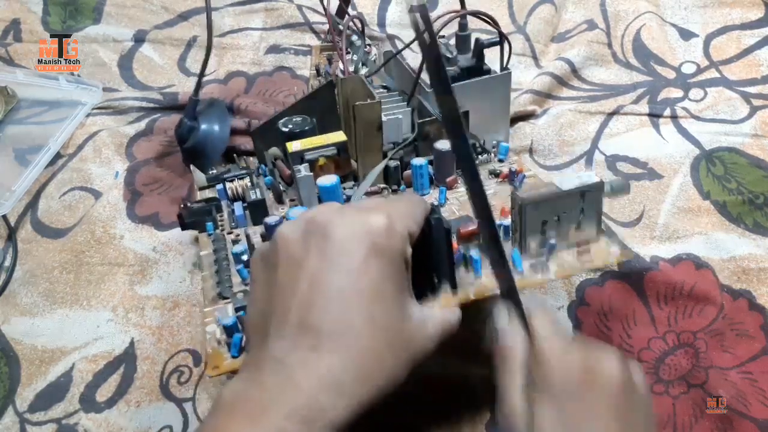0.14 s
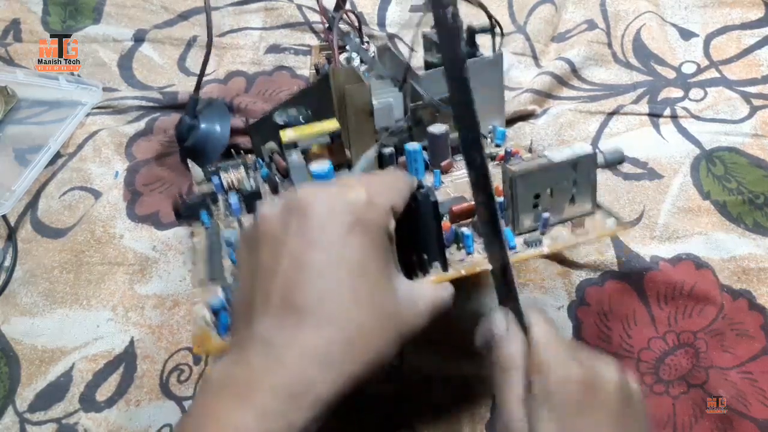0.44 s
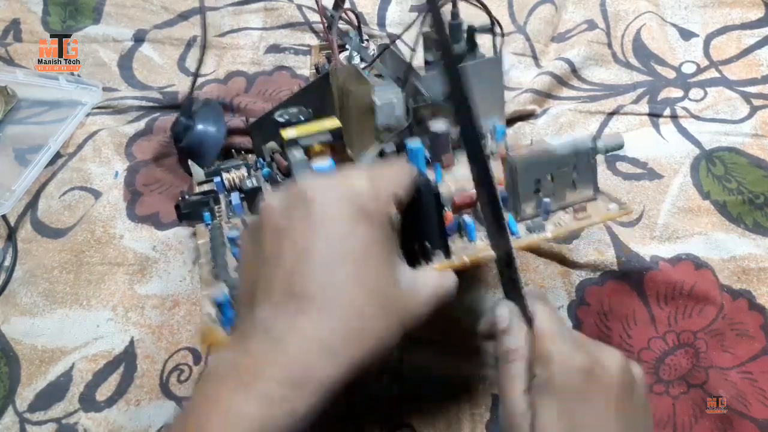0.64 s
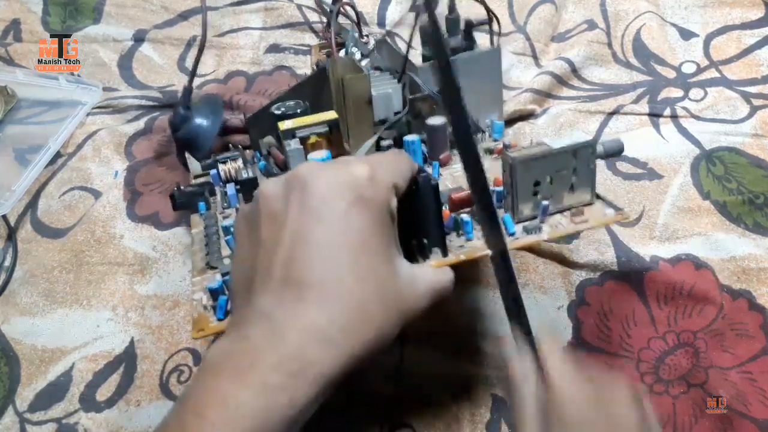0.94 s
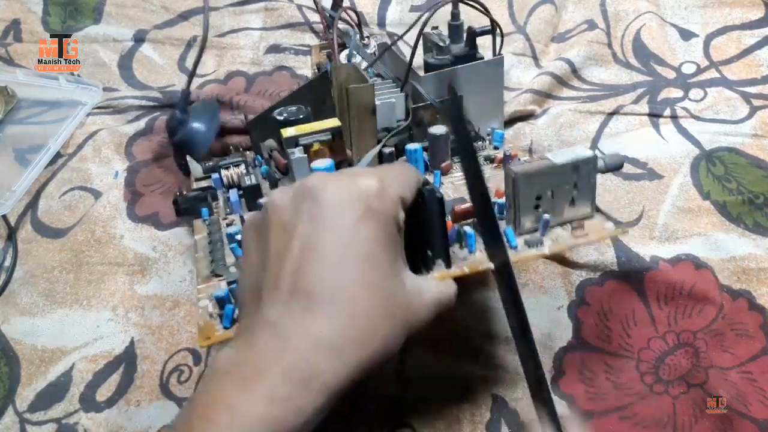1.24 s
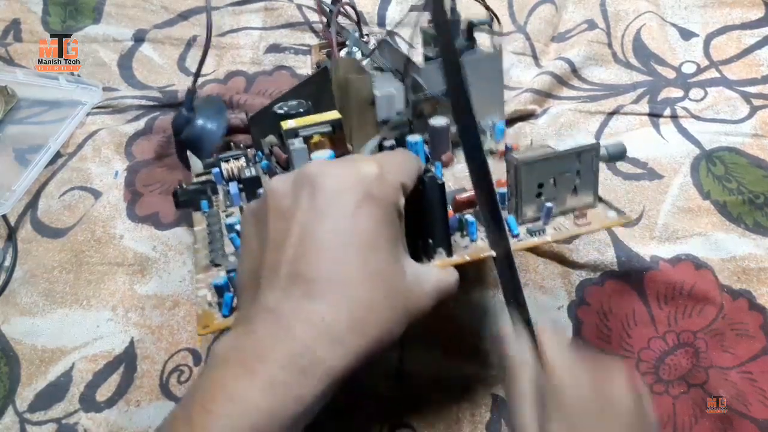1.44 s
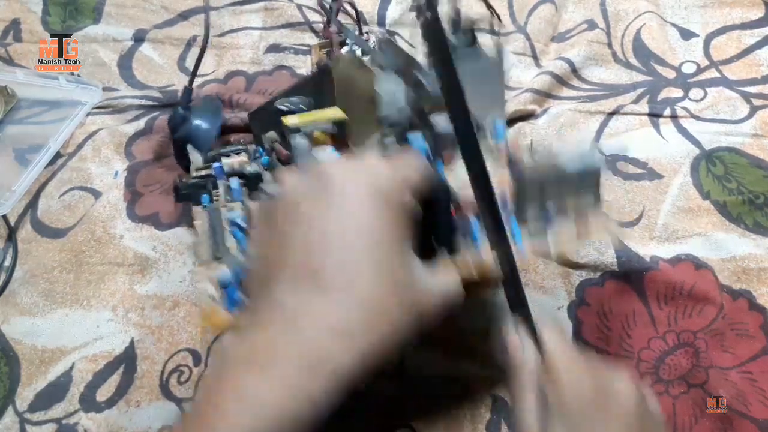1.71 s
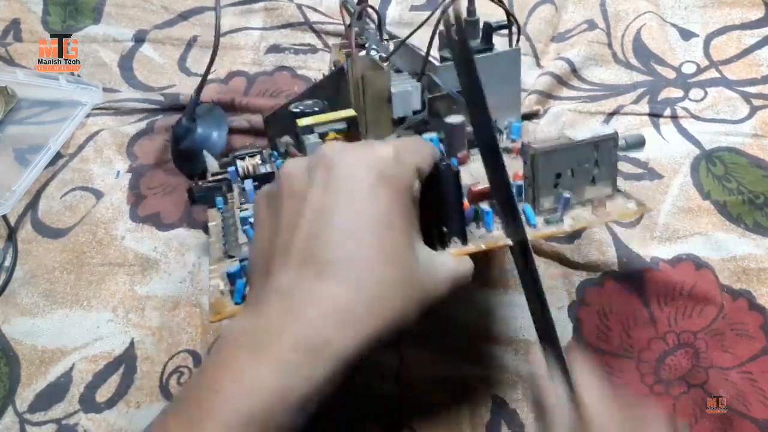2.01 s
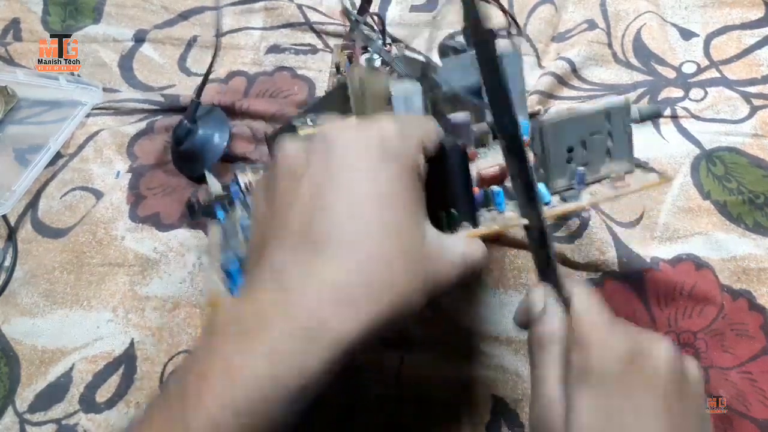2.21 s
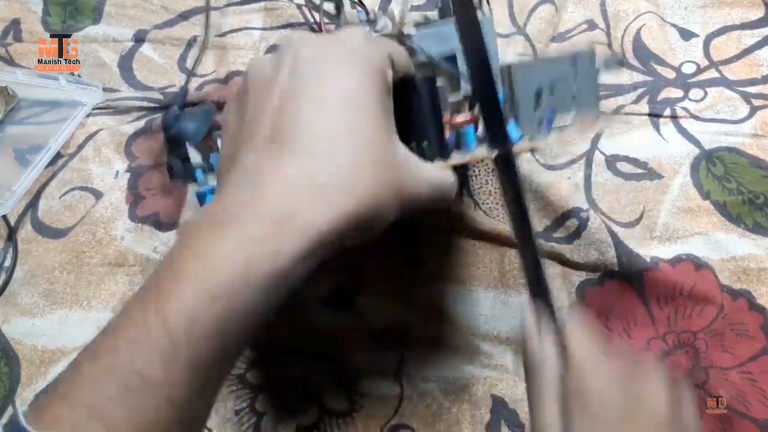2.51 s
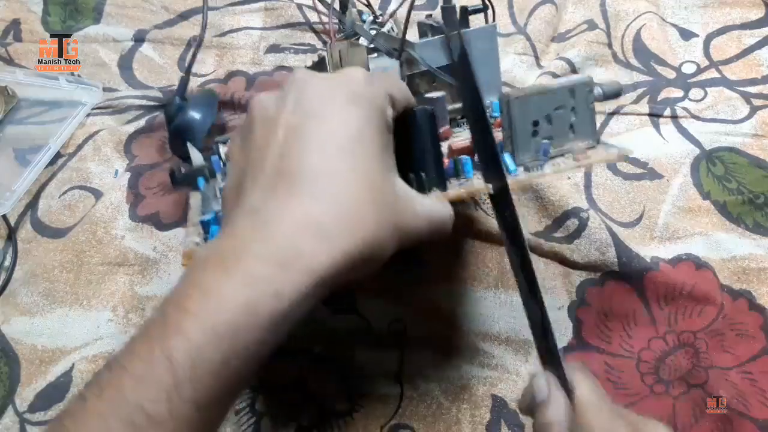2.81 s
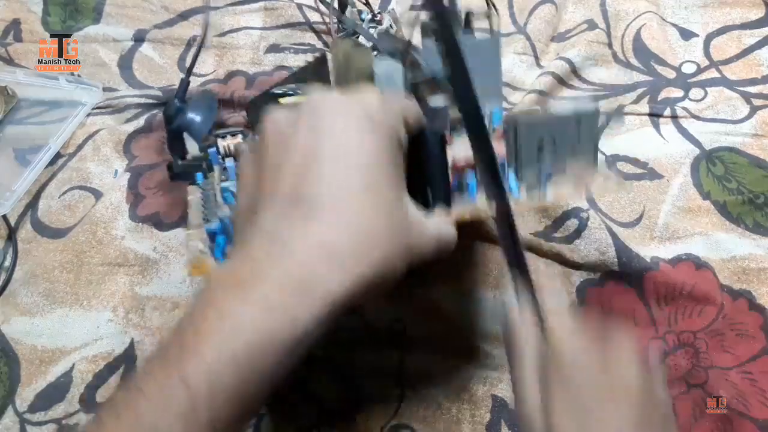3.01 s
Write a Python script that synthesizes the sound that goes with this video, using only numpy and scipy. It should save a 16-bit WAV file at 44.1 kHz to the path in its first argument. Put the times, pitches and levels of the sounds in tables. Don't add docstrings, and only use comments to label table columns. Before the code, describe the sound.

A hand hacksaw rasps back and forth through a circuit board, pausing briefly with small knocks.

```python
import sys
import numpy as np
from scipy import signal
from scipy.fft import rfft, irfft
from scipy.io import wavfile

SR = 44100
rng = np.random.default_rng(int(sys.argv[2]) if len(sys.argv) > 2 else 0)


def generate_wav(sig):
    pcm = np.round(np.clip(np.atleast_2d(sig).T, -1, 1) * 32767).astype(np.int16)
    wavfile.write(sys.argv[1], SR, pcm)


def volts_from_decibels(level):
    exponent = np.asarray(level, float) / 20
    return 10 ** exponent


N = 138915


def at_hz(points, hz):
    point_hz, point_db = np.transpose(points)
    return np.interp(np.log(hz), np.log(point_hz), point_db)


def rms_one(x):
    return x / np.sqrt(np.mean(x ** 2) + 1e-20)


def drift(rate_hz):
    r = np.exp(-2 * np.pi * rate_hz / SR)
    noise = rng.standard_normal(N + 5000)
    return rms_one(signal.lfilter([1], [1, -2 * r, r * r], noise)[5000:])


def air():
    # (frequency [Hz], level [dB])
    tone = [(40, -20), (90, -3), (130, 0), (350, -6), (700, -14), (1500, -21), (4000, -32), (9000, -39),
            (16000, -46)]
    hz = np.maximum(np.arange(N // 2 + 1) * SR / N, 1)
    spectrum = rfft(rng.standard_normal(N)) * volts_from_decibels(at_hz(tone, hz)) * (hz > 30)
    return volts_from_decibels(-43) * rms_one(irfft(spectrum, N))


def room(x):
    t60_s, level_db, wall_cut_hz = .36, -10, 7900
    t = np.arange(SR // 2) / SR
    decay = volts_from_decibels(-60 * t / t60_s / np.array([[1], [.6]]))
    dull, bright = rng.standard_normal((2, len(t))) * decay * np.clip(t / 0.0057, 0, 1)
    dull = signal.sosfilt(signal.butter(1, wall_cut_hz, fs=SR, output="sos"), dull)
    tail = dull + 0.47 * bright
    return volts_from_decibels(level_db) * signal.fftconvolve(x, tail / np.sqrt(np.sum(tail ** 2)))[:N]


def table(force):
    hz, t60_s = 328, .12
    r, w = volts_from_decibels(-60 / (t60_s * SR)), 2 * np.pi * hz / SR
    gain = np.sin(w) * np.sqrt(4 * (1 - r))
    return signal.lfilter([0, gain], [1, -2 * r * np.cos(w), r * r], force * rng.standard_normal(N))


def hits(s, db, length_s):
    out = np.zeros(N)
    out[(np.asarray(s) * SR).astype(int)] = volts_from_decibels(db)
    envelope = signal.lfilter([1], [1, -np.exp(-1 / (length_s * SR))], out + 1e-18)
    return envelope * rng.choice([-1, 1], N)


def snaps():
    # (time [s], peak level [dB])
    freed = [(0.302, 3.5), (0.315, -1), (.401, -16), (.417, -5), (0.424, -11.5), (.547, 3), (0.792, 10),
             (1.041, -15), (1.055, 1.5), (1.252, -5), (1.297, -16), (1.327, -5), (1.432, -7), (2.355, -26),
             (3.108, -4)]
    s, db = np.transpose(freed)
    zing = signal.butter(3, (8400, 11600), "band", fs=SR, output="sos")
    return signal.sosfilt(zing, hits(s, db, length_s=.0012))


def body(strong, strong_db, crowd, count):
    crowd_cycles = 24
    hz = np.geomspace(crowd[0][0], crowd[-1][0], count) * rng.uniform(.98, 1.02, count)
    level = volts_from_decibels(at_hz(crowd, hz)) * hz * rng.uniform(.4, 1, count) * rng.choice([-1, 1], count)
    s_hz, s_db, s_t60 = np.transpose(strong)
    luck_db = rng.normal(0, 3, len(s_db))
    s_level = volts_from_decibels(s_db + luck_db + .5 * at_hz(crowd, s_hz)) / np.sqrt(s_t60)
    s_level = s_level * rng.choice([-1, 1], len(s_db))
    t = np.arange(SR // 8)[:, None] / SR
    weak = (np.exp(-np.log(1000) * t * hz / crowd_cycles) * np.sin(2 * np.pi * hz * t)) @ level
    main = (np.exp(-np.log(1000) * t / s_t60) * np.sin(2 * np.pi * s_hz * t)) @ s_level
    ring = rms_one(weak) + volts_from_decibels(strong_db) * rms_one(main)
    return ring / np.sqrt(np.sum(ring ** 2))


def strike(clicks, strong, strong_db, crowd, count):
    spot = np.digitize(drift(25) + .5 * rng.standard_normal(N), [-.5, .5])
    out = np.zeros(N)
    for k in range(3):
        out += signal.fftconvolve(clicks * (spot == k), body(strong, strong_db, crowd, count))[:N]
    return out


def blade(sing, grit):
    # (frequency [Hz], level [dB], t60 [s])
    steel_modes = [(2990, -30, 0.025), (3294, 2, 0.037), (3570, -2, 0.021), (4105, 0, 0.056),
                   (5270, -30, .015), (6350, -2, .015), (8260, -2.5, 0.055), (9070, -14.5, 0.03),
                   (8745, -1, 0.01), (10180, -4.5, 0.014), (10970, -7, 0.0083), (11320, -5.5, 0.033),
                   (12000, -5.5, .02)]
    # (frequency [Hz], level [dB per Hz])
    sing_crowd = [(2500, -14), (4000, -6.5), (7000, -6), (9000, 4), (11500, -5.5), (13000, -26),
                  (15500, -9)]
    # (frequency [Hz], level [dB per Hz])
    grit_crowd = [(2500, -4), (3300, 2), (4500, -2), (6500, -5), (9000, -1), (11500, -2), (13500, -5),
                  (15900, -5)]
    return strike(sing, steel_modes, -5, sing_crowd, count=50) + strike(grit, steel_modes, -5, grit_crowd, count=50)


def board(bites, skips):
    # (frequency [Hz], level [dB], t60 [s])
    plate_modes = [(573.5, -11.5, 0.24), (522.7, 8.5, 0.043), (718.4, -11, 0.3), (783, -9, 0.12),
                   (921, 6.5, 0.043), (1012.6, 7.5, 0.04), (1096, 6, 0.033), (1205, -2.5, 0.21),
                   (1277, 4.5, 0.21), (1624, 4, 0.027), (1753, 8, 0.023), (1985, 6, 0.023),
                   (2439, 12, 0.02), (2370, 0, 0.02)]
    # (frequency [Hz], level [dB per Hz])
    bite_crowd = [(200, -8), (450, -15), (780, -3.5), (950, -0.5), (1400, -7.5), (2400, -8), (3300, -15),
                  (6000, -20)]
    # (frequency [Hz], level [dB per Hz])
    skip_crowd = [(200, -6.5), (650, -6.5), (1000, 1), (2400, -0.5), (2900, -2.5), (4200, -14.5),
                  (7000, -13)]
    ring = strike(bites, plate_modes, 1.5, bite_crowd, count=70)
    ring = ring + strike(skips, plate_modes, -3, skip_crowd, count=70)
    return signal.sosfilt(signal.butter(2, 185, "high", fs=SR, output="sos"), ring)


def teeth(per_s, spread_db):
    force_db = spread_db * np.minimum(rng.exponential(1, N), 3.5)
    sizes = volts_from_decibels(force_db) * rng.choice([-1, 1], N)
    return rms_one(sizes * (rng.random(N) < per_s / SR))


def catches():
    per_s, lift_db, length_s = 130, 6, .002
    count = np.floor(np.cumsum(per_s * volts_from_decibels(2.4 * drift(30))) / SR)
    jerk = np.diff(count, prepend=0) * rng.uniform(0.15, 1, N)
    return 1 + signal.lfilter([volts_from_decibels(lift_db)], [1, -np.exp(-1 / (length_s * SR))], jerk)


def strokes(rows, column, attack_s, swell_db, release_db_per_s):
    stop_share = 0.77
    t, out = np.arange(N) / SR, np.zeros(N)
    for row in rows:
        start_s, length_s, growth_db = row[0], row[2], row[4]
        u = t - start_s
        done = np.clip(u / length_s, 0, 1)
        swell = swell_db * (np.sin(np.pi * stop_share * done) - 1) + growth_db * (done - .5)
        fall = release_db_per_s * np.maximum(u - length_s, 0)
        out += np.clip(u / attack_s, 0, 1) * volts_from_decibels(row[column] + swell - fall)
    return out


def saw():
    # (start [s], board level [dB], cutting time [s], blade level [dB], growth of force [dB])
    pushes = [(-.12, -16, .1, -33, 7), (.112, -15.5, 0.078, -26.5, 0.5), (.355, -15.5, .092, -30, -1.5),
              (.617, -14, 0.07, -25.5, 5), (.862, -14, 0.081, -26.5, 5), (1.112, -13, 0.081, -34, 5.5),
              (1.364, -15, 0.089, -28, 5), (1.622, -15.5, 0.083, -27, 5.5), (2.166, -19.5, .085, -30, -2.5),
              (2.469, -19, 0.037, -30, -3), (2.666, -15.5, 0.095, -29, -2), (2.912, -16, 0.084, -28.5, 2)]
    # (start [s], board level [dB], skating time [s], blade level [dB], growth of force [dB])
    pulls = [(.012, -23.5, 0.067, -22.5, -12), (.240, -21, 0.091, -21.5, -8),
             (.496, -20.5, 0.093, -21, -9.5), (.742, -22, 0.079, -21, 2), (.995, -19.5, 0.077, -20.5, 4.5),
             (1.243, -20, 0.072, -21, 6), (1.503, -19.5, 0.072, -22.5, 2.5), (2.036, -23, 0.081, -28, 9),
             (2.300, -24.5, 0.074, -29, 9), (2.568, -20.5, 0.052, -28.5, 2),
             (2.800, -18.5, 0.071, -25, 1.5), (3.055, -22.5, 0.072, -26.5, 5)]
    # (time [s], peak level [dB], blade share [dB])
    knocks = [
        (1.821, -30, -9),
        (1.92, -29, -14),
        (1.942, -27.5, -7),
        (1.995, -18, -5),
        (2.037, -22, -21),
        (2.236, -14, -1),
        (2.445, -26, -15),
        (2.471, -11, -30),
    ]
    push_attack_s, push_release = 0.0025, 787
    pull_attack_s, pull_release = 0.001, 458
    board_column, blade_column, blade_swell_db = 1, 3, 3.5
    chatter_db, knock_length_s = 1.5, 0.0027

    chatter = volts_from_decibels(chatter_db * drift(70))
    push = strokes(pushes, board_column, push_attack_s, 2.5, push_release) * chatter
    pull = strokes(pulls, board_column, pull_attack_s, 7.5, pull_release) * chatter
    knock_s, knock_db, share_db = np.transpose(knocks)
    knock_db = knock_db - 2
    knock = hits(knock_s, knock_db, knock_length_s)
    bites = push * rms_one(catches() * teeth(1500, spread_db=3.0)) + knock
    skips = pull * teeth(2500, spread_db=3.5) + knock

    chips = volts_from_decibels(chatter_db * drift(76)) * teeth(11000, spread_db=3.5)
    grit = strokes(pushes, blade_column, push_attack_s, blade_swell_db, push_release) * chips
    sing = strokes(pulls, blade_column, pull_attack_s, blade_swell_db, pull_release) * chips
    grit = grit + hits(knock_s, knock_db + share_db, knock_length_s)

    support = table(volts_from_decibels(-17) * push + volts_from_decibels(-10) * pull)
    return board(bites, skips) + support + blade(sing, grit)


def regrip(x):
    # (frequency [Hz], width [Hz], level [dB])
    shifts = [(1103, 140, 1), (1686, 70, 8.5), (2600, 900, -6), (3240, 170, 9.5), (8200, 1800, 5.5),
              (10300, 3000, -4)]
    regrip_s = 2.46
    late = x * (np.arange(N) > regrip_s * SR)
    early = x - late
    for hz, width_hz, db in shifts:
        a, c, g = np.pi * width_hz / SR, -2 * np.cos(2 * np.pi * hz / SR), volts_from_decibels(db / 2)
        late = signal.lfilter([1 + a * g, c, 1 - a * g], [1 + a / g, c, 1 - a / g], late)
    return early + late


def scene():
    close = regrip(saw() + snaps())
    return (close + room(close) + air())[None]


def top_cut(x):
    return signal.sosfilt(signal.butter(12, 16340, fs=SR, output="sos"), x)


def record(dry):
    rounded = .95 * np.tanh(dry / .95)
    heard = signal.sosfilt(signal.butter(2, 59, "high", fs=SR, output="sos"), rounded)
    heard = signal.sosfilt(signal.ellip(10, .5, 60, 15900, fs=SR, output="sos"), heard)
    return top_cut(heard)


dry = scene()
out = record(dry)
generate_wav(out)
```